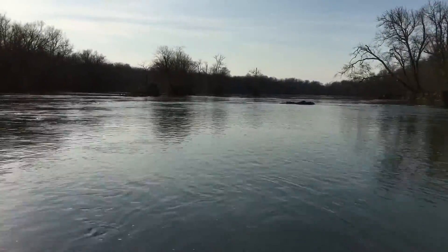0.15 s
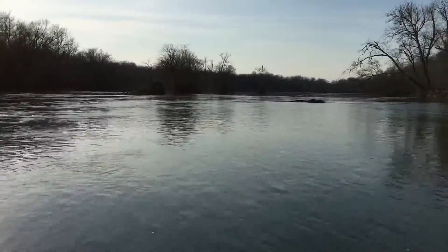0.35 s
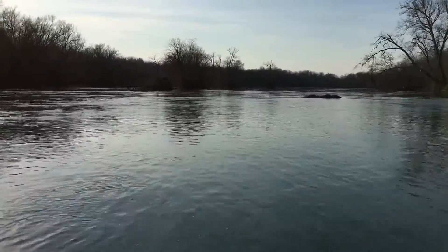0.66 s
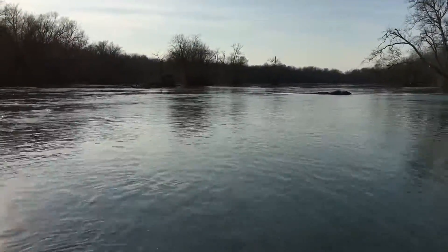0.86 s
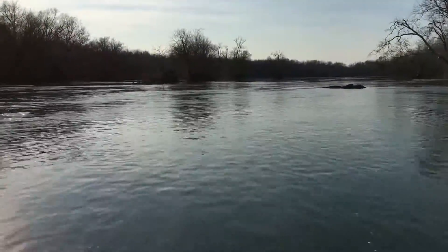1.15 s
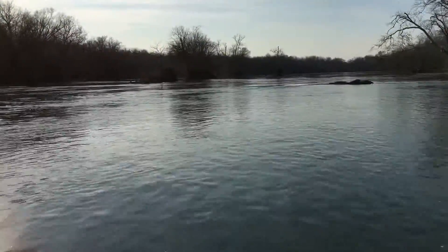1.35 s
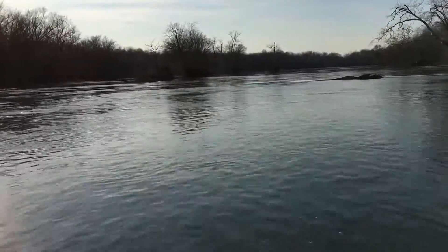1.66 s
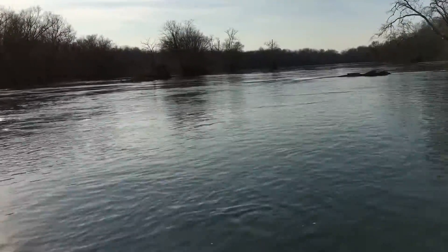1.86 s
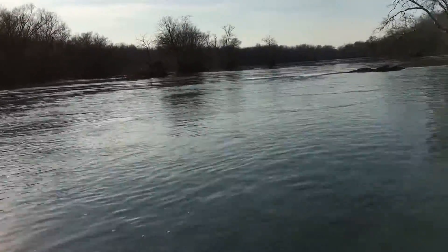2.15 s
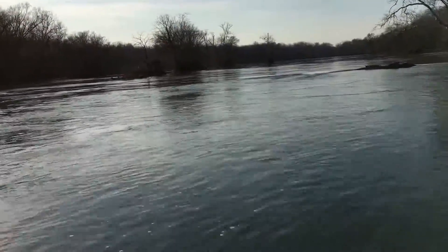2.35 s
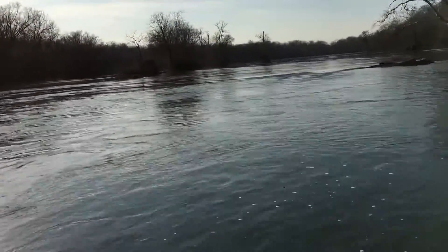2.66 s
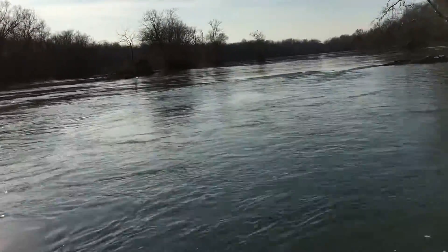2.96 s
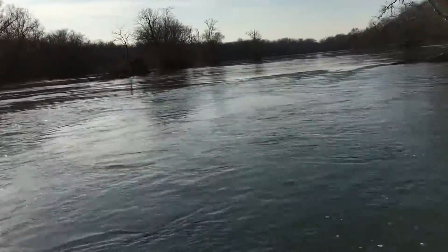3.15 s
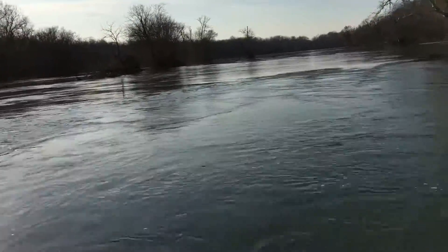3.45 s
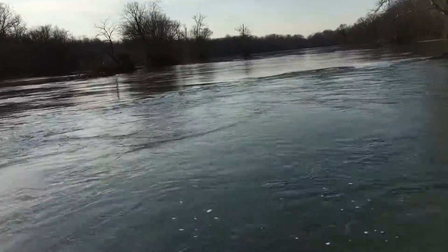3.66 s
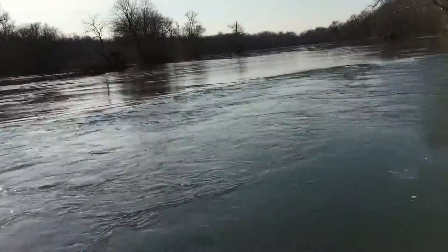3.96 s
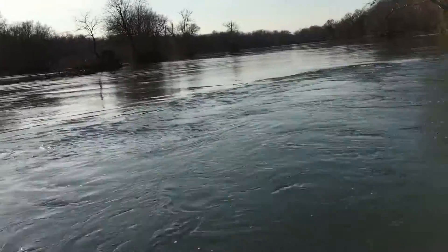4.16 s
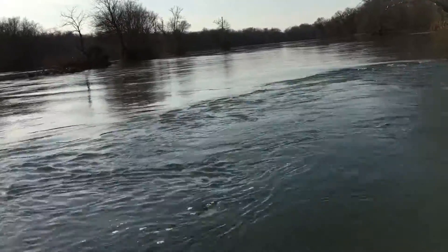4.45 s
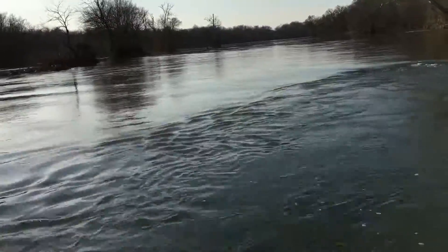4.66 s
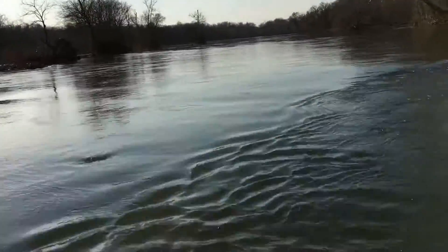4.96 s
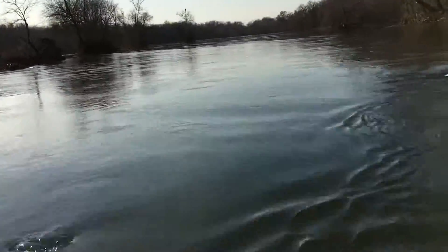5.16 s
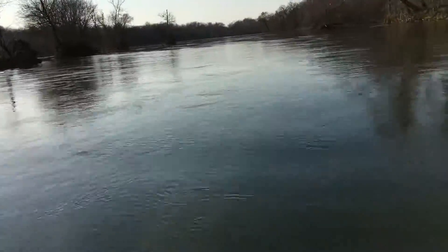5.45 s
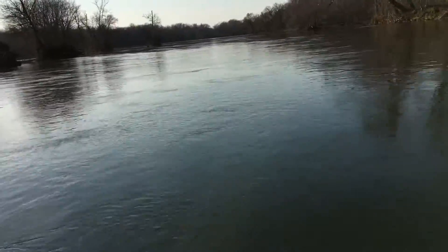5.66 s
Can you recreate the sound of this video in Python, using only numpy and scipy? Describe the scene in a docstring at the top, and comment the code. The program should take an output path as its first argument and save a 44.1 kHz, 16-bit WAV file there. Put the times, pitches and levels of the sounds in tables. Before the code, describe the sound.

On board a cruising jet boat: steady low engine hum dominates over watery wash, hull roar and faint hiss, easing after a banked turn.

```python
"""A jet boat cruises along a river, heard from on board, its four-cylinder engine droning at a slowly sinking pitch.
For the first two seconds it banks into a turn: burble, hull roar and wash are strong, and the drone swells and dips.
Ripples slap the sides and the exhaust gulps; then the load eases, the spray thins and returns, and a third gulp comes.
Near 5 s the head wind rumbles up for half a second. Sines make the drone; coloured, fluttering noise makes
the gas, water and wind."""
import sys
import numpy as np
from scipy import signal
from scipy.fft import rfft, irfft
from scipy.io import wavfile

SR = 44100
rng = np.random.default_rng(int(sys.argv[2]) if len(sys.argv) > 2 else 0)


def file_out(sig):
    """Save sig as 16-bit WAV at sys.argv[1]."""
    # one column per channel
    cols = np.atleast_2d(sig).T
    # limit, then scale
    lim = np.clip(cols, -1, 1)
    pcm = np.round(lim * 32767).astype(np.int16)
    wavfile.write(sys.argv[1], SR, pcm)


N = 256212
TIME = np.arange(N) / SR
BIN_HZ = np.maximum(np.arange(N // 2 + 1) * SR / N, 1)


def from_db(db):
    """Logarithmic level: 20 dB is a factor of ten in amplitude."""
    return 10 ** (np.asarray(db) / 20)


def rms_one(x):
    """Normalisation: the root of the mean power becomes one."""
    return x / np.sqrt(np.mean(x ** 2) + 1e-20)


def in_time(rows):
    """Linear interpolation: each column of a curve is read at every sample."""
    seconds, *columns = np.transpose(rows)
    return [np.interp(TIME, seconds, column) for column in columns]


def drift(rate_hz):
    """Low-pass noise: a random sway of unit rms, changing about rate_hz times a second."""
    spectrum = rfft(rng.standard_normal(N))
    return rms_one(irfft(spectrum / (1 + (BIN_HZ / rate_hz) ** 2), N))


def swells(rows):
    """Raised-cosine envelopes: smooth rises and falls about their middles, summed in dB."""
    total_db = 0
    for middle_s, change_db, length_s in rows:
        position = np.clip((TIME - middle_s) / length_s, -.5, .5)
        total_db = total_db + change_db * np.cos(np.pi * position) ** 2
    return total_db


def bursts(rows, attack_s, decay_s):
    """Transient envelopes: a linear rise to each peak, then exponential decay, summed in dB."""
    total_db = 0
    for peak_s, rise_db in rows:
        attack = np.clip(1 + (TIME - peak_s) / attack_s, 0, 1)
        decay = np.exp(-np.clip((TIME - peak_s) / decay_s, 0, 20))
        total_db = total_db + rise_db * attack * decay
    return total_db


def turbulence(colour, patchy_db, patch_rate, count=10):
    """Turbulent spectrum: coloured noise of unit rms whose octaves each flutter independently."""
    hz, level_db = np.transpose(colour)
    gain = from_db(np.interp(np.log(BIN_HZ), np.log(hz), level_db))
    # the skirts fall away below and above the listed colour
    low_skirt = 1 + (hz[0] / BIN_HZ) ** 2
    high_skirt = (1 + (BIN_HZ / (2 * hz[-1])) ** 2) ** 2
    spectrum = gain / low_skirt / high_skirt * rfft(rng.standard_normal(N))
    # octaves are numbered downwards from half the sample rate
    octave = np.clip(np.log2(SR / 2 / BIN_HZ).astype(int), 0, count - 1)
    heard = np.unique(octave[(BIN_HZ > hz[0] / 2) & (BIN_HZ < 2 * hz[-1])])
    noise = 0
    for k in heard:
        band = irfft(spectrum * (octave == k), N)
        noise = noise + band * from_db(patchy_db * drift(patch_rate))
    return rms_one(noise)


# head wind, before its gain and gusts: (time [s], level [dB])
WIND_LEVEL = [(0, -30.5), (0.45, -30), (2.9, -34), (3.05, -30.5), (3.3, -34), (3.6, -32), (4.7, -32.5),
              (5.0, -24.5), (5.5, -25), (5.7, -32.3), (5.81, -35)]
# spectrum of the wind: (frequency [Hz], relative density [dB per Hz])
WIND_SPECTRUM = [(14, -34), (25, -11), (38, -13), (52, -3.5), (75, -2.5), (110, -4), (150, 0.5),
                 (200, -27.5), (320, -22.5)]


def wind(gain_db=1.0, gust_db=0.7, gust_rate=4.0):
    """Flow noise: eddies buffet the microphone in small random gusts."""
    level_db, = in_time(WIND_LEVEL)
    gusting_db = level_db + gain_db + gust_db * drift(gust_rate)
    return from_db(gusting_db) * turbulence(WIND_SPECTRUM, patchy_db=0.8, patch_rate=6.2)


# fine mist, before its gain and surges; the drops follow a share of it: (time [s], level [dB])
SPRAY_LEVEL = [(0, -42), (0.25, -42.7), (1.0, -44), (1.15, -44), (1.7, -45.6), (2.1, -48.0), (3.1, -45.5),
               (3.55, -46), (3.7, -44.5), (4.5, -44.4), (4.87, -46.2), (5.2, -43), (5.38, -47), (5.68, -40),
               (5.81, -42)]
# sheets of coarse drops landing: (time of the peak [s], rise of the drops [dB])
SPLASH_EVENTS = [(.22, 4), (1.08, 2), (1.24, 1), (2.69, 4)]
# spectra of coarse drops and fine mist: (frequency [Hz], relative density [dB per Hz])
DROP_SPECTRUM = [(900, 1), (1450, -0.5), (1680, 5), (1950, 4), (2300, 3.5), (2950, -0.5), (3350, 1.5),
                 (4400, -0.5), (5500, -1.5), (6700, -3.5), (8000, -7.5), (12000, -16)]
MIST_SPECTRUM = [(3000, -28), (5500, -4.5), (7500, -0.5), (8800, 1), (9800, 0.5), (11300, -1.5),
                 (13000, -3.3), (15700, -5.5)]
# drops: base level [dB], and the dB gained per dB of load
DROPS_DB, DROPS_FOLLOWS = -41.5, 0.38


def spray(load_db, mist_db=1.45, drops_share=0.31, surge_db=0.43, surge_rate=12.0):
    """Superposed impacts: fine mist hisses and coarse drops rush, more as the load throws more water."""
    spray_db, = in_time(SPRAY_LEVEL)
    drop_db = DROPS_DB + DROPS_FOLLOWS * load_db
    drop_db = drop_db + drops_share * (spray_db - spray_db.mean())
    drop_db = drop_db + bursts(SPLASH_EVENTS, attack_s=.04, decay_s=.07)
    drops = from_db(drop_db) * turbulence(DROP_SPECTRUM, patchy_db=0.94, patch_rate=18.0)
    mist = from_db(spray_db + mist_db) * turbulence(MIST_SPECTRUM, patchy_db=0.9, patch_rate=27.0)
    return (drops + mist) * from_db(surge_db * drift(surge_rate))


# water churning in the jet, before its gain; also trims the engine's orders: (time [s], level [dB])
CHURN_LEVEL = [(0, -31), (0.4, -35.5), (0.65, -37.5), (1.6, -40.0), (2.3, -40), (2.6, -36), (2.9, -36.5),
               (3.5, -36), (4.1, -36), (4.25, -40.5), (4.8, -35), (5.3, -39), (5.5, -34.5), (5.81, -40.5)]
# ripples slapping the sides: (time of the peak [s], rise of the wash [dB])
SLAP_EVENTS = [(.53, 4), (.61, 2), (.75, 4), (1.3, 6), (1.4, 5), (1.68, 5), (1.77, 4), (2.04, 1), (2.92, 6),
               (5.47, 4.5)]
# spectra of jet churn, hull roar and side wash: (frequency [Hz], relative density [dB per Hz])
CHURN_SPECTRUM = [(190, -25), (270, 0), (330, -2.5), (400, -3), (480, -5.5), (700, -34.5)]
ROAR_SPECTRUM = [(420, -10.5), (490, -4.5), (545, 1), (635, -2.5), (710, -3), (820, -8.5), (1100, -16.5),
                 (1600, -27.5)]
WASH_SPECTRUM = [(480, -9), (700, -5), (860, 1), (1020, -2), (1300, -3.5), (1460, -6.5), (1680, -6.5),
                 (1900, -10), (2400, -15.5), (4000, -19), (8000, -50)]
# base level in straight running [dB], and the dB gained per dB of load
ROAR_DB, ROAR_FOLLOWS = -42, 1.43
WASH_DB, WASH_FOLLOWS = -41, 0.33


def water(firings, load_db, churn_db=-1.0, throb=0.07):
    """Amplitude modulation: the jet churns; hull roar and side wash throb once per engine cycle."""
    churn_level, = in_time(CHURN_LEVEL)
    cycle = np.sin(2 * np.pi * firings / 4)   # four firings make one engine cycle
    roar_db = ROAR_DB + ROAR_FOLLOWS * load_db
    wash_db = WASH_DB + WASH_FOLLOWS * load_db + bursts(SLAP_EVENTS, attack_s=0.03, decay_s=0.018)
    churn = from_db(churn_level + churn_db) * turbulence(CHURN_SPECTRUM, patchy_db=2.6, patch_rate=14.0)
    roar = from_db(roar_db) * turbulence(ROAR_SPECTRUM, patchy_db=1.3, patch_rate=9.6)
    wash = from_db(wash_db) * turbulence(WASH_SPECTRUM, patchy_db=1.37, patch_rate=55.0)
    return churn + (roar + wash) * (1 + throb * cycle)


# the exhaust gulps and lets out a burst of gas: (time of the peak [s], rise of the burble [dB])
GULP_EVENTS = [(1.24, 4.5), (1.69, 4), (3.84, 9)]
# spectrum of the burble: (frequency [Hz], relative density [dB per Hz])
BURBLE_SPECTRUM = [(100, -13), (140, -5), (170, -0.5), (200, -0.5), (232, -2.5), (258, -14), (300, -18),
                   (380, -37)]
# base level in straight running [dB], and the dB gained per dB of load
BURBLE_DB, BURBLE_FOLLOWS = -32, 1.4


def burble(load_db, uneven_db=1.0, uneven_rate=3.9):
    """Narrow-band noise: irregular gas bursts ring around the drone and beat against it, more under load."""
    level_db = BURBLE_DB + BURBLE_FOLLOWS * load_db + uneven_db * drift(uneven_rate)
    level_db = level_db + bursts(GULP_EVENTS, attack_s=.04, decay_s=0.036)
    return from_db(level_db) * turbulence(BURBLE_SPECTRUM, patchy_db=0.27, patch_rate=7.2)


# engine orders before trim; unequal cylinders give the quarters:
# (multiple of the firing rate, level relative to the drone [dB])
ENGINE_ORDERS = [(.5, -30), (.75, -24.5), (1.5, -30.5), (1.75, -35), (2, -29.5), (3, -36), (3.25, -42),
                 (3.5, -41), (3.75, -42), (4, -38), (4.25, -47), (4.75, -47), (5, -48), (6, -47), (7, -49)]
# the drone swells or dips as the exhaust rides the waterline:
# (time of the middle [s], change [dB], length [s])
WATERLINE_SURGES = [(.01, -2.5, 0.17), (.53, -3.2, 0.15), (.62, -7.5, 0.072), (.7, -1.6, 0.11),
                    (.83, 4, 0.18), (.89, -5, 0.092), (1.36, 2, 0.16), (1.91, -2, .07), (1.98, 2.5, 0.12),
                    (2.1, -1, 0.15), (4.1, 1.8, .14), (5.15, 2, 0.17), (5.22, -3, 0.13)]
# drone level [dB]; its random sway at zero load [dB]; growth of that sway [dB per dB of load]
DRONE_DB, DRONE_UNREST_DB, UNREST_FOLLOWS = -14, 0.34, 0.98


def engine(firings, load_db, waver=0.28, waver_rate=2.8, scatter_rad=0.2, churn_follows=0.87,
           load_follows=0.8, high_orders_db=-1.0, second_db=1.0, second_chokes=1.64, unrest_rate=10.0):
    """Periodic source: an almost pure tone at the firing rate; weak orders waver as combustion varies."""
    churn_level, = in_time(CHURN_LEVEL)
    unrest_db = DRONE_UNREST_DB * from_db(UNREST_FOLLOWS * load_db) * drift(unrest_rate)
    drone_db = DRONE_DB + swells(WATERLINE_SURGES) + unrest_db
    out = from_db(drone_db) * np.sin(2 * np.pi * firings)
    for multiple, order_db in ENGINE_ORDERS:
        # as the hull trims, low orders swell with the churning and high ones with the load
        if multiple <= 2:
            trim_db = churn_follows * (churn_level - churn_level.mean())
        else:
            trim_db = high_orders_db + load_follows * load_db
        if multiple == 2:   # load chokes the second order
            trim_db = trim_db + second_db - second_chokes * load_db
        phase = 2 * np.pi * (multiple * firings + rng.random()) + scatter_rad * drift(waver_rate)
        amplitude = from_db(DRONE_DB + order_db + trim_db) * (1 + waver * drift(waver_rate))
        out = out + amplitude * np.sin(phase)
    return np.sqrt(2) * out   # makes the stated levels rms


# how hard the hull presses into the water, greatest as it banks into a turn:
# (time [s], load relative to straight running [dB])
HULL_LOAD = [(0, 5), (0.25, 2.0), (0.75, 6), (1.0, 3.7), (1.4, 6.5), (1.58, 3.4), (1.85, 3.7), (2.65, -1.2),
             (2.95, -0.8), (3.6, -0.3), (3.95, 0.7), (4.25, 0), (4.85, 1.5), (5.81, -0.5)]
# firing rate at the start [Hz], and how fast it sinks [Hz per s]
FIRING_HZ, SAG_HZ_PER_S = 177.6, .36


def scene():
    """Superposition at fixed distances: all sources travel with the boat and share its load and firings."""
    firings = np.cumsum(FIRING_HZ - SAG_HZ_PER_S * TIME) / SR   # running count
    load_db, = in_time(HULL_LOAD)
    background = wind() + spray(load_db) + water(firings, load_db)
    return (background + burble(load_db) + engine(firings, load_db))[None]


# dips in the response of the microphone port: (frequency [Hz], width [Hz], depth [dB])
PORT_RESPONSE = [(4940, 200, -4.5), (7650, 730, -2.5), (10420, 670, -5)]


def record(dry):
    """Linear filtering: the microphone port carves dips in the treble, and the top is cut steeply."""
    port_db = sum(depth_db / (1 + (2 * (BIN_HZ - hz) / width_hz) ** 2) for hz, width_hz, depth_db in PORT_RESPONSE)
    through_port = irfft(rfft(dry) * from_db(port_db), N)
    # order 12, 0.1 dB ripple, 90 dB rejection, edge at 15720 Hz
    low_pass = signal.ellip(12, .1, 90, 15720, fs=SR, output="sos")
    return signal.sosfilt(low_pass, through_port)


dry = scene()
out = record(dry)
file_out(out)
```